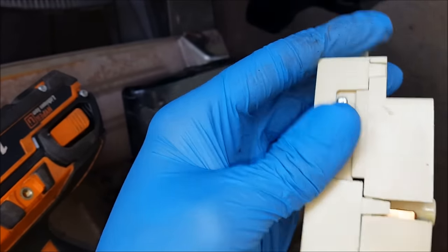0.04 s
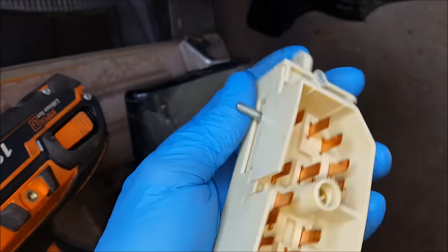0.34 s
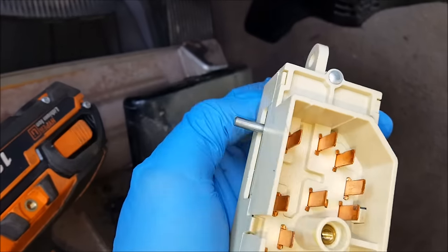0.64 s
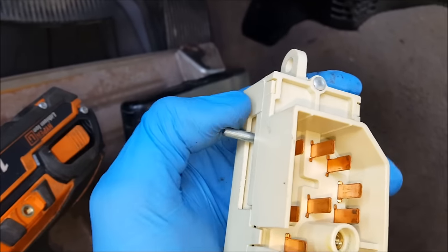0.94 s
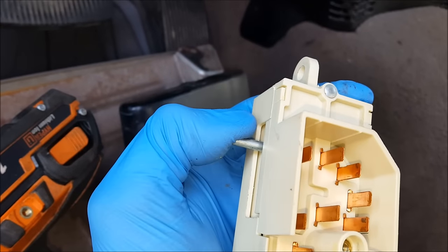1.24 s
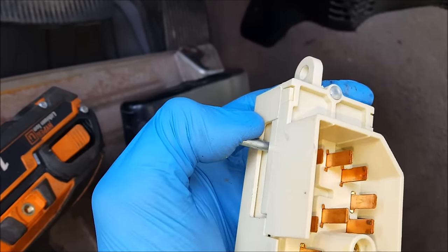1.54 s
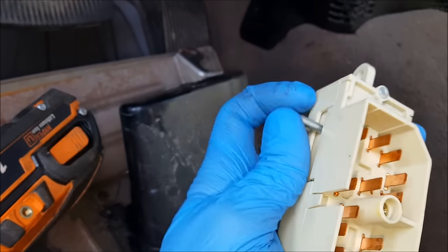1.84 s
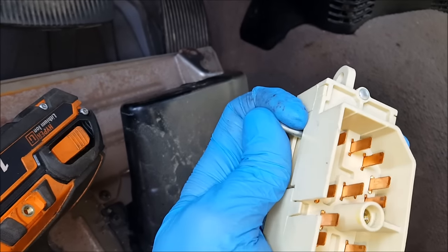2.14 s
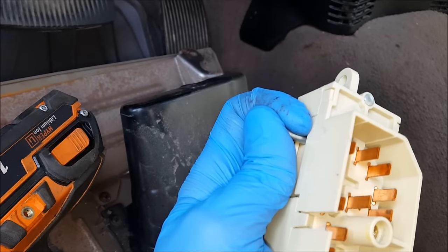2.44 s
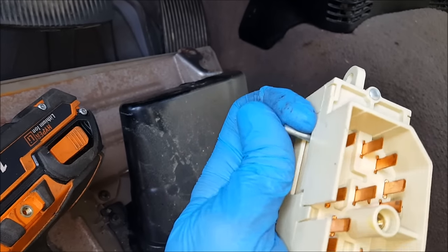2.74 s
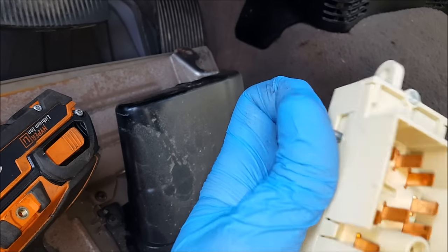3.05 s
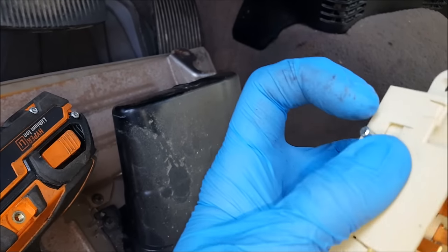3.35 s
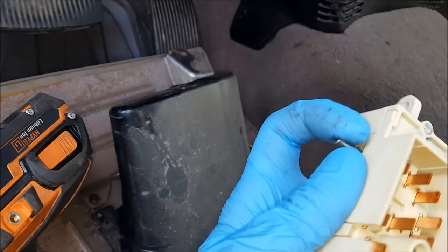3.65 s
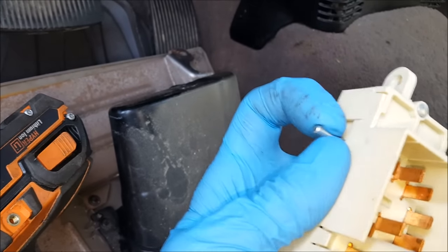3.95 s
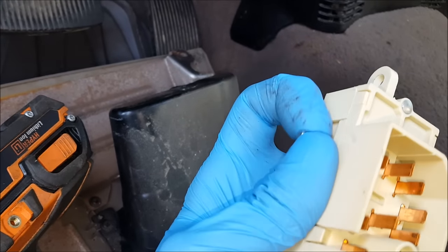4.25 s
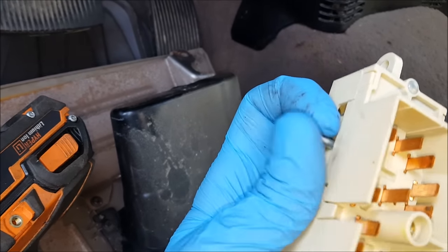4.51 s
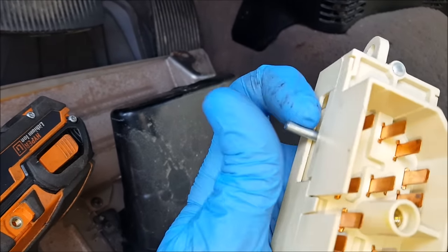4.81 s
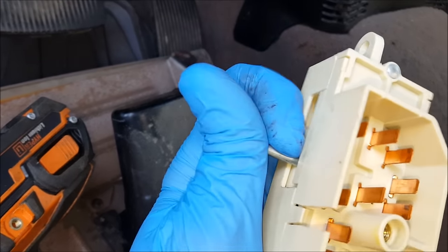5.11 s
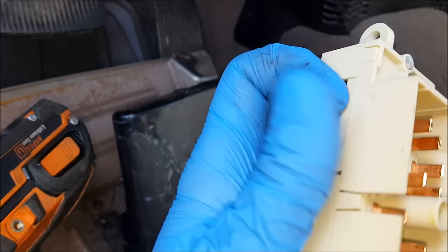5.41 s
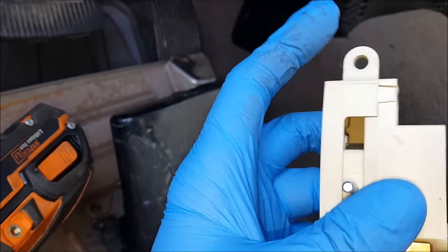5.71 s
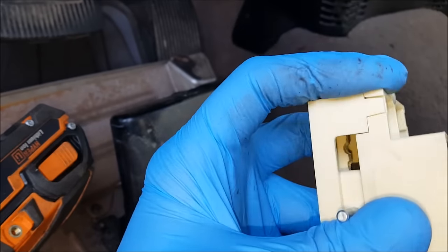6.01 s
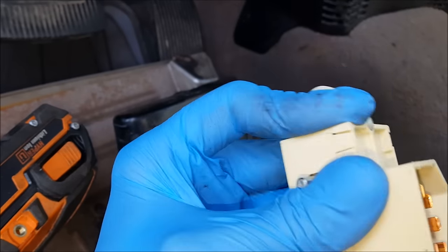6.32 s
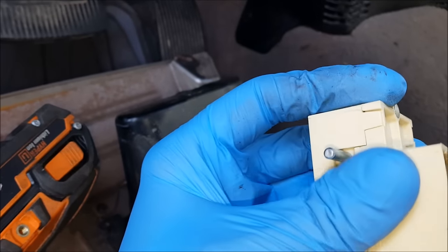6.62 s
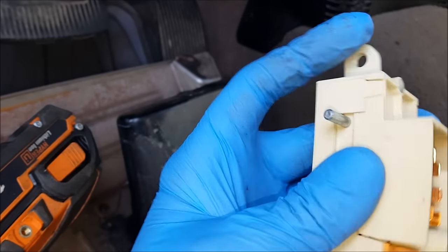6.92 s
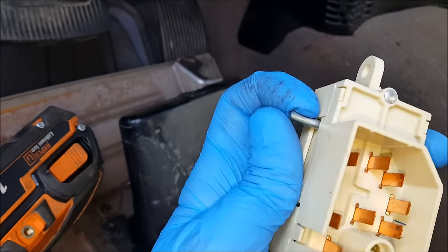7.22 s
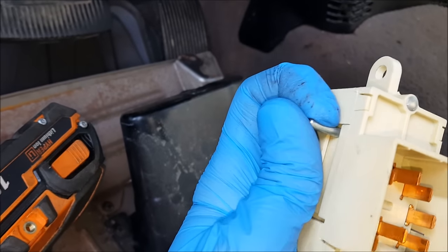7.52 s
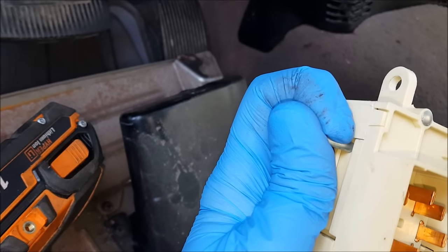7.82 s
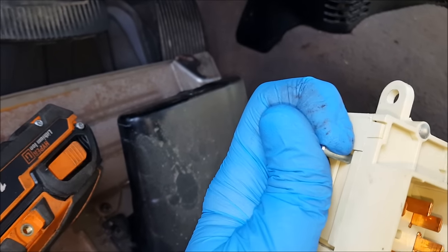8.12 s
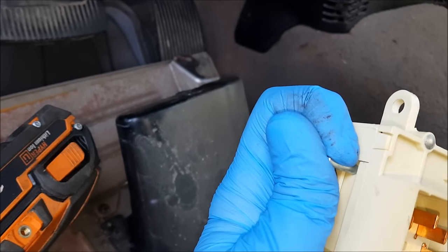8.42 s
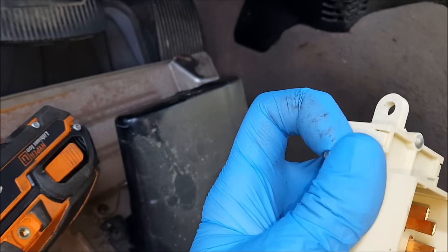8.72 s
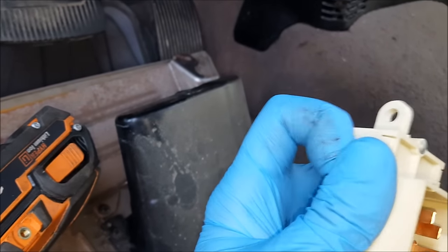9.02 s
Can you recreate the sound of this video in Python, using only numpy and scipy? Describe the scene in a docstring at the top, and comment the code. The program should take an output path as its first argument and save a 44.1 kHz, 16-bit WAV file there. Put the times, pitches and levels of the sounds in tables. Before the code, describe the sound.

A car engine idles with a steady low rumble, heard from the footwell. Close to the microphone, rubber gloves rustle softly over a plastic switch, with light ticks from its loose metal pin. Midway the pin gives a small cluster of clicks, then a sharp snap, then a louder snap with a thump as it slams home. Faint handling continues, and near the end the engine slows slightly and booms.

```python
"""A sprung metal pin scrapes along the slot of a plastic switch, snaps through a detent and slams home
with a thump; each impact excites the damped modes of pin and housing. Gloved hands turn the switch over
close to the microphone, in the footwell of a car, rustling and squeaking by stick-slip friction.
The engine idles throughout, and a faint hum sinks away at the start. Gain control ducks the idle after
the loudest snaps; at the end the engine slows, and one harmonic booms in a cabin resonance."""
import sys
import numpy as np
from scipy import signal
from scipy.fft import rfft, irfft
from scipy.io import wavfile
from scipy.ndimage import uniform_filter1d, minimum_filter1d

SR = 44100
rng = np.random.default_rng(int(sys.argv[2]) if len(sys.argv) > 2 else 0)


def output_pcm(signal):
    """Save a mono or channel-first signal as 16-bit PCM at the path in sys.argv[1].

    Samples are clipped to [-1, 1] before scaling.
    """
    pcm = np.clip(np.atleast_2d(signal).T, -1, 1) * 32767
    wavfile.write(sys.argv[1], SR, np.round(pcm).astype(np.int16))


N = 399546
TIME = np.arange(N) / SR
BINS = np.fft.rfftfreq(N, 1 / SR)

# Levels in the tables are relative; T60 is the time taken to decay by 60 dB.
# engine harmonics: multiple of the firing rate, level/dB
HARMONICS = [(1, -58), (2, -58), (3, -47.5), (4, -48.5), (5, -45.5), (6, -48), (7, -52), (8, -50.5),
             (9, -46.5), (10, -49), (11, -51.5), (12, -47), (13, -58.5), (14, -52), (18, -57)]
# cabin resonance: f/Hz, half width/Hz, gain/dB
CABIN_MODE = (109, 4.4, 17)
# resonances of the car body: f/Hz, width/Hz, level/dB
BODY_MODES = [(87.4, 21, -42.5), (108.4, 22, -41)]
# slow swell of body boom and wash: t/s, gain/dB
SWELL = [(0, -.5), (1, -2), (2, -0.84), (6.2, -0.3), (8.6, 0.52), (9.06, 2)]
# spectrum of the wash of engine and fan noise: f/Hz, level/dB
WASH_SPECTRUM = [(20, -10.5), (55, -8), (85, -5.5), (160, -3.5), (290, 2), (470, -4.5), (750, -4),
                 (1080, -10), (1600, -13.5), (2000, -17), (2900, -22.5), (3800, -28.5), (7000, -40),
                 (15500, -49.5)]
# likeness of the wash at the left and right microphone ports: f/Hz, correlation
WASH_CORRELATION = [(25, .85), (70, 1), (150, 1), (300, .92), (600, .85), (1200, 0.2), (2500, 0.24),
                    (6000, 0.41), (15000, 0.28)]
# whirring resonances in the wash: f/Hz, width/Hz, level/dB
WHIRR_BANDS = [(905, 83, 6.5), (1264, 230, 7), (1830, 150, 2), (2685, 62, 6.5)]
# brief lift of one band of the wash: start/s, duration/s, f/Hz, width/Hz, gain/dB
WASH_LIFT = (1.58, 1.07, 670, 260, 4.5)
# strokes of the glove over the plastic: start/s, duration/s, level/dB
STROKES = [(.02, .15, -64), (0.227, 0.23, -62.5), (.41, 0.075, -49.5), (0.492, 0.079, -56),
           (0.556, 0.11, -55), (0.659, .075, -48.5), (0.763, .07, -61), (0.838, 0.092, -57.5),
           (1.709, 0.16, -52), (1.858, .12, -53), (1.976, 0.21, -63), (2.62, .36, -66.5),
           (3.109, 0.074, -55.5), (3.348, .1, -58), (3.49, 0.16, -56.5), (3.655, .05, -57.5),
           (3.74, .22, -66), (4.57, .15, -64), (4.985, .14, -62), (5.4, .25, -60.5), (5.68, .06, -61),
           (5.94, .08, -61), (6.058, .23, -60), (6.93, 0.15, -60), (7.11, .12, -59.5), (7.32, 0.094, -66),
           (8.07, .12, -67), (8.6, 0.17, -61)]
# spectrum of the glove's friction: f/Hz, level/dB
RUB_SPECTRUM = [(800, -12), (2500, 1.5), (4500, 0.5), (6000, 0.5), (7300, -0.5), (10000, -0.5), (13000, 0),
                (16000, -3)]
# reverberation of the footwell: f/Hz, T60/s
FOOTWELL_DECAY = [(150, 0.12), (700, 0.093), (2000, 0.1), (5000, .09), (14000, 0.036)]
# imbalance of near sounds between the ports: f/Hz, left minus right/dB
PORT_BALANCE = [(100, -5), (500, 5.5), (1100, -9.5), (2100, 2.5), (4200, -6.5), (8000, 1.5), (12500, 0.5)]
# spectrum of an impact's dense crack: f/Hz, level/dB
CRACK_SPECTRUM = [(300, -10.5), (650, -7), (1000, 9.5), (1650, 3), (2900, -3), (4200, 1), (6800, 0),
                  (7800, -3.5), (9000, 4), (10500, -2), (11600, -1), (13000, -2.5), (14300, -1),
                  (15800, -9.5)]
# modes of the plastic housing: f/Hz, level/dB, T60/s
HOUSING_MODES = [(920, 1, 0.024), (1244, 5, 0.036), (2048, 2, 0.038), (2270, -6, 0.039), (2520, -3, 0.058),
                 (2897, 0, .042), (3160, -1, .04), (3600, -8.5, .03), (5400, -8.5, 0.024)]
# modes of the metal pin and its spring: f/Hz, level/dB, T60/s
PIN_MODES = [(2100, -2, .025), (4470, -1.5, .026), (4720, -1, .026), (4980, -3.5, 0.019), (9650, -7, .022),
             (10400, -10.5, .022), (11400, -7.5, .022), (13600, -9, .022)]
# light contacts of loose pin and fingertips: t/s, level/dB, tilt/(dB/octave)
TICKS = [(.4316, -43, 3), (.6774, -47, -1), (.7004, -39, -12), (.8979, -51, 3), (1.0131, -49.5, 3),
         (1.947, -41, -7), (2.0178, -45, -8), (3.128, -44.5, -7), (3.1817, -46.5, -5), (3.3817, -45, -5),
         (4.246, -42, -16), (5.0739, -49, 0), (5.0903, -44, -2), (5.6127, -40.5, -9), (5.627, -47, -5),
         (5.9773, -45, -10), (6.1095, -42, -8), (6.2628, -53, -2.5), (7.6804, -48.5, -8), (7.947, -44, -15),
         (8.1936, -44.5, -4), (8.8189, -47.5, -1)]
# pin contacts, a few to a click: t/s, level/dB, low cutoff/Hz, tilt/(dB/octave), housing ring/dB
SNAPS = [(4.357, -26, 1100, -.5, -5), (4.3598, -25.5, 1100, 1, -1), (4.3625, -26, 1100, -1, -8),
         (4.3648, -30, 1400, 0, -2), (4.3856, -30, 3000, 1, -14), (4.3886, -23.5, 1700, 1, -13),
         (4.3968, -33, 1800, 0, -14), (5.2017, -29, 2500, 0.5, -9.5), (5.2051, -12.5, 1700, 0.5, 1.5),
         (5.2088, -18.5, 1498, 2, -3), (5.2149, -14, 2410, 0, -10.5), (5.2228, -30.5, 1406, -5.5, -3),
         (6.1664, -25, 1896, -10, -14), (6.3751, -25, 3000, -0.5, -9), (6.3782, -8.5, 2800, -3.5, -9.5),
         (6.384, -6.5, 1500, 0.5, -14), (6.3867, -4.5, 800, -1, -7.5)]
# glove squeaks: start/s, duration/s, f/Hz, glide/(Hz/s), level/dB
SQUEAKS = [(4.573, .265, 4900, 397, -56), (8.97, .12, 7650, 4000, -71)]
# jolt of the pin on its end stop: t/s, peak level/dB, pulse width/s
THUMP = (6.3891, -6, 0.00074)


def gain_of(db):
    """Amplitude ratio of a level in decibels."""
    return 10 ** (np.asarray(db) / 20)


def unit_rms(x):
    """Normalisation to rms 1."""
    return x / np.sqrt(np.mean(x ** 2) + 1e-20)


def read(points, hz):
    """Interpolation of a table on a log-frequency axis."""
    f, value = np.transpose(points)
    return np.interp(np.log(hz + 1), np.log(f + 1), value)


def curve(rows):
    """Linear interpolation of a time table at every sample."""
    return np.interp(TIME, *np.transpose(rows))


def add(mix, start, sound):
    """Superposition of a stereo sound on the mix, from a start in seconds."""
    part = mix[:, round(start * SR):][:, :sound.shape[1]]
    part += sound[:, :part.shape[1]]


def shaped(x, gain):
    """Filtering as multiplication of the spectrum."""
    return irfft(rfft(x) * gain, x.shape[-1])


def resonance(hz, width):
    """Lorentzian peak of height 1 over the frequency bins."""
    return 1 / (1 + (2 * (BINS - hz) / width) ** 2)


def wander(rate_hz):
    """Random fluctuation: low-passed noise of rms 1."""
    return unit_rms(shaped(rng.standard_normal(N), 1 / (1 + (BINS / rate_hz) ** 4)))


def port_phase(hz, lag_s=0.00038):
    """Path difference: the phase by which the right port lags the left."""
    return 2 * np.pi * hz * lag_s


def at_ports(x):
    """Arrival delay: a distant sound reaches the left port first."""
    return np.array([x, shaped(x, np.exp(-1j * port_phase(BINS)))])


def firing_rate(idle_hz=28.91, sag_from_s=8.3, sag_hz_per_s2=4.2):
    """The engine's fundamental: steady at idle, then falling ever faster."""
    return idle_hz - sag_hz_per_s2 * np.maximum(TIME - sag_from_s, 0) ** 2


def engine(level_db=-.5, waver=.33, scatter_rad=0.6, scatter_from_hz=130):
    """Periodic firing gives a harmonic series; a harmonic that meets the cabin mode booms by resonance."""
    firing = firing_rate()
    cycles = np.cumsum(firing) / SR
    mode_hz, half_width, mode_db = CABIN_MODE
    out = np.zeros((2, N))
    for order, db in HARMONICS:
        hz = order * firing
        boost_db = mode_db / (1 + ((hz - mode_hz) / half_width) ** 4)
        amplitude = np.sqrt(2) * gain_of(db + level_db + boost_db)
        # standing waves shift the higher tones from port to port
        shift = port_phase(hz[0]) + scatter_rad * rng.choice([-1, 1]) * (hz[0] > scatter_from_hz)
        phase = 2 * np.pi * (order * cycles + rng.random()) - np.array([[0], [shift]])
        out += amplitude * (np.cos(phase) + waver * wander(rate_hz=3.4) * np.sin(phase + np.pi / 4))
    return out


def body_boom(level_db=-0.8):
    """Forced vibration: the car body, shaken at random, booms unevenly at its resonances."""
    out = np.zeros((2, N))
    for hz, width, db in BODY_MODES:
        vibration = unit_rms(shaped(rng.standard_normal(N), resonance(hz, width)))
        out += at_ports(gain_of(db + level_db + curve(SWELL)) * vibration)
    return out


def wash(level_db=-38.0, throb=0.069, whirr_db=-2, whirr_follow=3.0):
    """Broadband engine and fan noise, amplitude-modulated by the firing; its whirr grows as it swells."""
    common, independent = rng.standard_normal((2, N))
    correlation = np.clip(read(WASH_CORRELATION, BINS), 0, 1)
    left, right = at_ports(common)
    right = shaped(right, correlation) + shaped(independent, np.sqrt(1 - correlation ** 2))
    broad = unit_rms(shaped(np.array([left, right]), gain_of(read(WASH_SPECTRUM, BINS))))
    swell_db = curve(SWELL)
    whirr = shaped(broad, sum((gain_of(db) - 1) * resonance(hz, width) for hz, width, db in WHIRR_BANDS))
    whirr *= gain_of(whirr_db + whirr_follow * np.minimum(swell_db, 2))
    modulation = 1 + throb * np.cos(2 * np.pi * np.cumsum(firing_rate()) / SR)
    return gain_of(level_db + swell_db) * modulation * (broad + whirr)


def hum(start_hz=303, sink_hz=60.1, sink_s=.5, level_db=-39, fade_db_per_s=17.5):
    """A faint pure tone sinks in pitch and dies by exponential decay."""
    hz = start_hz - sink_hz * (1 - np.exp(-TIME / sink_s))
    tone = np.sqrt(2) * np.sin(2 * np.pi * np.cumsum(hz) / SR)
    return at_ports(tone * gain_of(level_db - fade_db_per_s * TIME))


def sliding(grip_db=-77, pointedness=0.93, uneven_db=1.5):
    """Friction envelope: each stroke is one uneven arch above the faint rustle of the grip."""
    arches = sum(gain_of(db) * np.sin(np.pi * np.clip((TIME - start) / length, 0, 1)) ** pointedness
                 for start, length, db in STROKES)
    return (gain_of(grip_db) + arches) * gain_of(uneven_db * wander(rate_hz=25))


def impulses(per_s, spread_db, max_db):
    """Poisson process: sparse impulses with exponentially distributed, capped levels."""
    occurs = rng.random(N) < per_s / SR
    return occurs * gain_of(np.minimum(spread_db * rng.exponential(1, N), max_db))


def glove(rub_db=1.0, smooth=0.9, crackle_db=-60, crackle_s=.003):
    """Irregular stick-slip of rubber on plastic gives a grainy hiss; now and then a crease crackles."""
    grains = impulses(per_s=1100, spread_db=1, max_db=4)
    flutter = unit_rms(np.sqrt(abs(uniform_filter1d(grains ** 2, size=40))) + 1e-9) + smooth
    hiss = unit_rms(shaped(rng.standard_normal((2, N)) * flutter, gain_of(read(RUB_SPECTRUM, BINS))))
    creases = gain_of(crackle_db) * impulses(per_s=12, spread_db=3, max_db=6)
    crackle = signal.lfilter([1], [1, -np.exp(-1 / (crackle_s * SR))], creases)
    return hiss * (gain_of(rub_db) * sliding() + crackle)


def footwell_echo(x):
    """Reverberation: absorption by the padding keeps the tail short, most of all in the treble."""
    hz, t, spectra = signal.stft(rng.standard_normal((2, SR // 3)), SR, nperseg=128)
    decay = gain_of(-60 * t / read(FOOTWELL_DECAY, hz)[:, None])
    tail = signal.istft(spectra * decay, SR, nperseg=128)[1]
    tail[:, :SR // 300] = 0  # gap before the first reflection
    return signal.fftconvolve(x, tail / np.linalg.norm(tail[0]), axes=1)[:, :N]


def impact(level_db, t60, low_hz, tilt_db, housing_db, pin_db, spike=1.3, spike_s=0.00079):
    """Impulsive excitation: a sharp spike, a dense dying crack, and the ring of housing and pin."""
    t = np.arange(4096) / SR
    hz = np.fft.rfftfreq(len(t), 1 / SR)

    def force(f):
        """Excitation spectrum: light contacts leave the low modes still; harder edges are brighter."""
        return gain_of(tilt_db * np.log2((f + 1) / 5000)) / np.sqrt(1 + (low_hz / (f + 1)) ** 6)

    def ring(modes):
        """Free vibration: a sum of damped sines that starts near rms 1."""
        f, db, mode_t60 = np.transpose(modes)[:, :, None]
        amplitude = gain_of(db) * force(f)
        phase = 2 * np.pi * (f * t + rng.random((2, len(f), 1)))
        tones = amplitude * gain_of(-60 * t / mode_t60) * np.sin(phase)
        return np.sqrt(2) * tones.sum(1) / np.linalg.norm(amplitude)

    spectrum = gain_of(read(CRACK_SPECTRUM, hz)) * force(hz)
    crack = unit_rms(shaped(rng.standard_normal((2, len(t))), spectrum))
    crack *= gain_of(-60 * t / t60) * (1 + spike * np.exp(-t / spike_s))
    ringing = gain_of(housing_db) * ring(HOUSING_MODES) + gain_of(pin_db) * ring(PIN_MODES)
    return gain_of(level_db) * (crack + ringing)


def ticks(level_db=-5):
    """Light impacts of the loose pin and fingertips weakly excite the modes of the switch."""
    out = np.zeros((2, N))
    for start, db, tilt_db in TICKS:
        tick = impact(db + level_db, t60=0.069, low_hz=3000, tilt_db=tilt_db + 1,
                      housing_db=-10, pin_db=-10)
        add(out, start, tick)
    return out


def band_lift(x):
    """Spectral colouring: one band swells and sinks back, so the wash sounds briefly hollower."""
    start, length, hz, width, db = WASH_LIFT
    arch = np.sin(np.pi * np.clip((TIME - start) / length, 0, 1)) ** 2
    return x + (gain_of(db) - 1) * arch * shaped(x, resonance(hz, width))


def snaps(level_db=-1, pin_ring_db=-1, light_contact_db=-22.5, ring_loss=0.68):
    """Impacts of the sprung pin in its slot: light ones ring the pin, hard ones mostly crack."""
    out = np.zeros((2, N))
    for start, db, low_hz, tilt_db, housing_db in SNAPS:
        pin_db = pin_ring_db - ring_loss * max(db - light_contact_db, 0)
        t60 = 0.034 * (1500 / low_hz) ** .45  # contacts that stir only high modes die sooner
        add(out, start, impact(db + level_db, t60, low_hz, tilt_db, housing_db, pin_db))
    return out


def squeak(start, length, pitch_hz, glide_hz_per_s, level_db,
           jitter=0.0078, octave_db=-19, falter_db=3, rise_s=.028, stop_s=.018, fade_db_per_s=52):
    """Periodic stick-slip of the glove makes a thin whistle that peaks early, falters and fades."""
    t = np.clip(TIME - start, 0, length)
    hz = (pitch_hz + glide_hz_per_s * t) * (1 + jitter * wander(rate_hz=336))
    phase = 2 * np.pi * np.cumsum(hz) / SR
    whistle = np.sin(phase) + gain_of(octave_db) * np.sin(2 * phase)
    whistle *= gain_of(falter_db * wander(rate_hz=39))
    edges = np.minimum(t / rise_s, 1) * np.minimum((length - t) / stop_s, 1)
    return unit_rms(whistle) * edges * gain_of(level_db - fade_db_per_s * t)


def thump(rebound_hz=62):
    """A pressure pulse: the jolted housing gives the air one short push, then a slower swing back."""
    peak_s, db, width_s = THUMP
    push = np.exp(-((TIME - peak_s) / width_s) ** 2 / 2)
    swing = signal.sosfilt(signal.butter(2, rebound_hz, "high", fs=SR, output="sos"), push)
    return gain_of(db) * swing / abs(swing).max()


def scene(echo_db=-16):
    """Superposition of the switch and glove near the microphone and the engine all around."""
    near = snaps() + ticks() + glove() + sum(squeak(*row) for row in SQUEAKS)
    near += gain_of(echo_db) * footwell_echo(near)
    port_gains = gain_of(np.outer([.5, -.5], read(PORT_BALANCE, BINS)))
    return shaped(near, port_gains) + thump() + engine() + body_boom() + band_lift(wash()) + hum()


def record(dry, threshold_db=-17.0, slope=1.28, hold_s=0.57, recover_db_per_s=110, ease_s=0.12,
           hiss_db=-77, edge_hz=15800):
    """Automatic gain control ducks after a loud snap, holds and recovers; then hiss, clipping, low-pass."""
    power_db = 10 * np.log10(abs(uniform_filter1d((dry ** 2).mean(0), size=900)) + 1e-12)
    over_db = slope * np.maximum(power_db - threshold_db, 0)
    hold = 2 * int(hold_s * SR / 2) + 1
    held_db = -minimum_filter1d(-over_db, hold, origin=hold // 2, mode="constant")  # recent maximum
    recovery_db = recover_db_per_s * TIME
    duck_db = np.maximum.accumulate(held_db + recovery_db) - recovery_db
    pole = np.exp(-1 / (ease_s * SR))
    eased_db = signal.lfilter([1 - pole], [1, -pole], duck_db)
    ducked = dry * gain_of(-eased_db) + gain_of(hiss_db) * rng.standard_normal(dry.shape)
    low_pass = signal.firwin(511, edge_hz, window=("kaiser", 9), fs=SR)
    return signal.oaconvolve(np.clip(ducked, -1, 1), low_pass[None], "same")


dry = scene()
out = record(dry)
output_pcm(out)
```